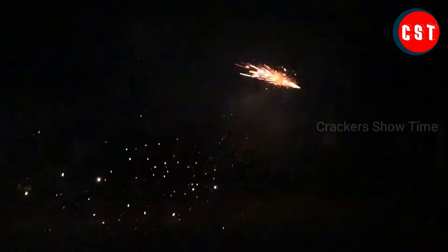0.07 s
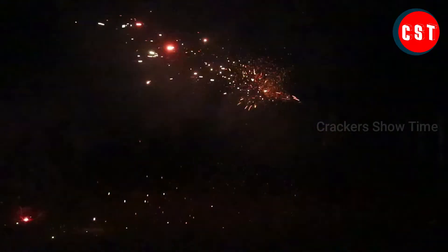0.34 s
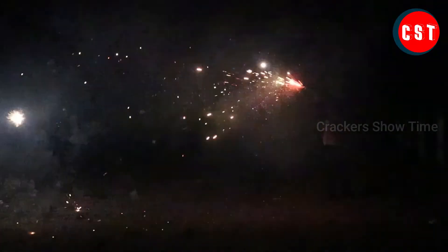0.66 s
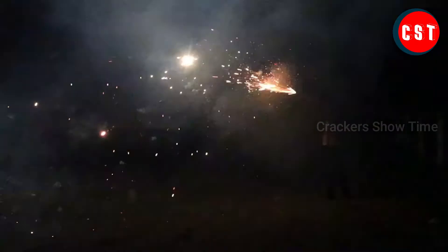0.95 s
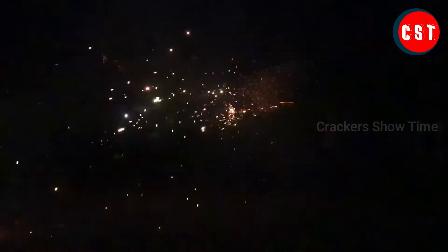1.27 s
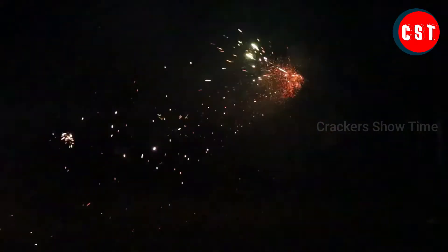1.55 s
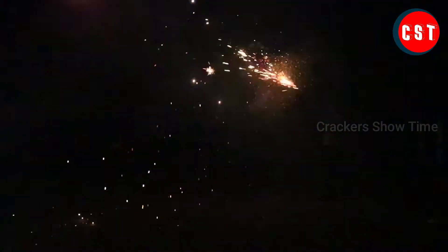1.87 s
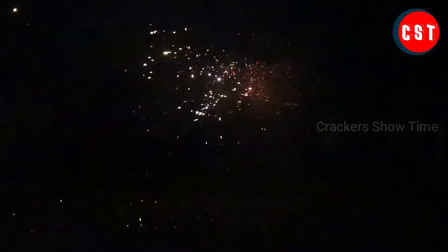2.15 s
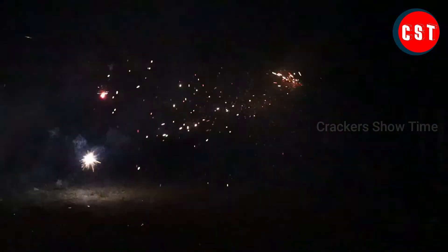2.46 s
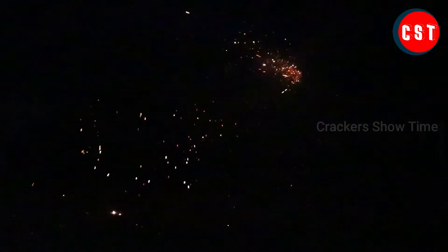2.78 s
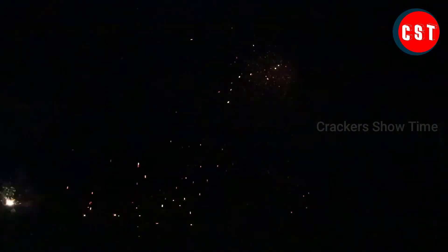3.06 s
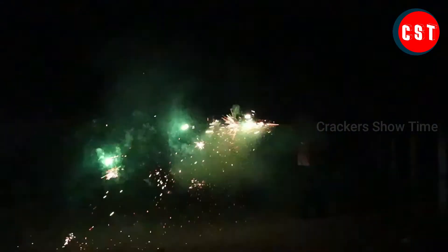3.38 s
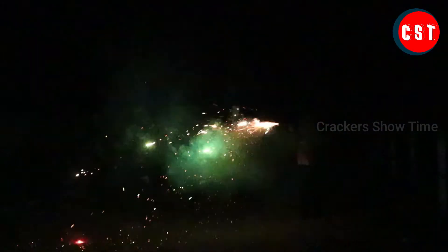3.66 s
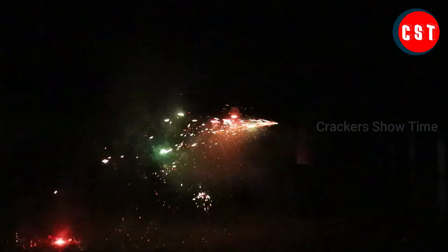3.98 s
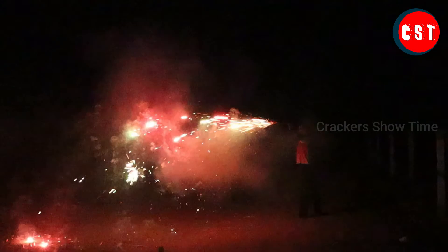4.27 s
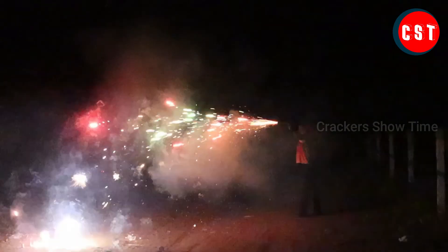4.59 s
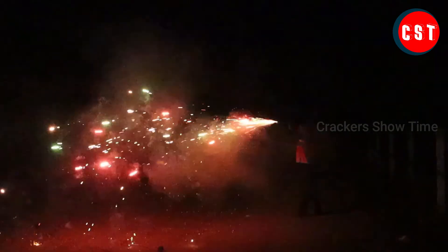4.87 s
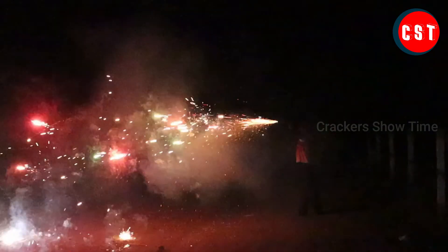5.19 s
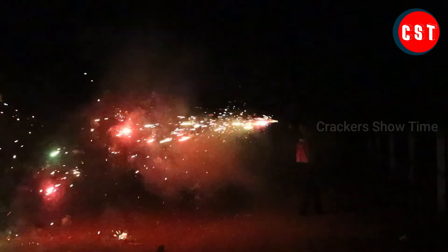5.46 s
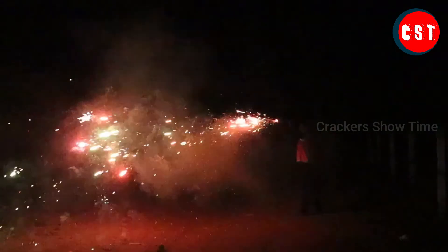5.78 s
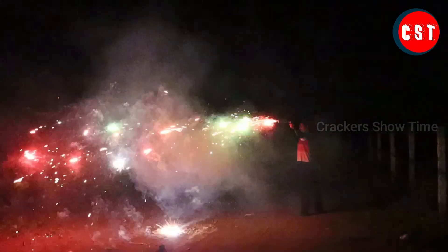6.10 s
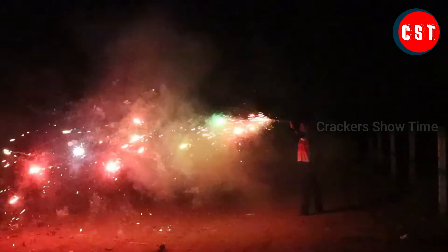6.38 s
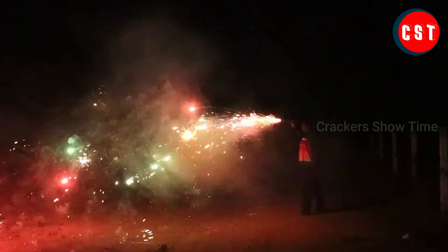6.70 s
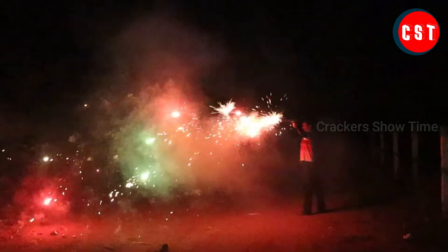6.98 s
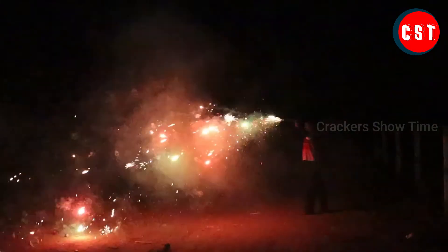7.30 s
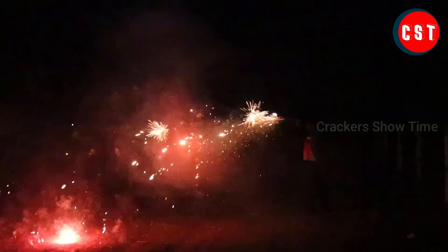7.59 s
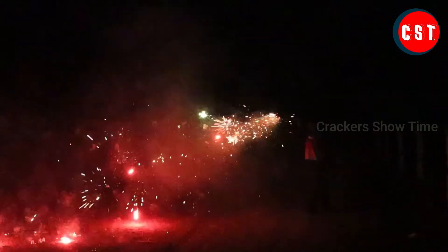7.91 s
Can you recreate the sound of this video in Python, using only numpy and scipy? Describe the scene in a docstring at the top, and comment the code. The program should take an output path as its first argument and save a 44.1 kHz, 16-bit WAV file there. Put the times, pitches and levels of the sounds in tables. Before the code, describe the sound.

A hand-held firework burns outdoors, some metres from the microphone. It opens with a soft hiss and fizz, dotted with tiny snapping sparks. From about 0.3 seconds its stars burst in a rapid, irregular volley of sharp, bright cracks, centred to slightly left. Each has a small thud, a close second crack and a short echo from the yard with a faint tail. The loudest, around 0.65, 0.9 and between 2.2 and 2.5 seconds, briefly overload the microphone. The cracks grow weaker and sparser near 3 seconds, and at about 3.4 seconds the crackling and its echo cut off abruptly. From there until the end at about 8 seconds, the firework gives only soft, uneven spurts of hiss, several a second and slightly hollow in tone. Some carry a low roar at their crest, most noticeably near 4.8 and 6.4 seconds.

```python
"""A soft hiss and fizz, then a volley of sharp cracks: a hand-held firework sprays sparks at night.
Each bursting star sends out a blast wave, followed by its reflection from the ground, a second crack
and the echo of the yard; the loudest overload the microphone some metres away. The crackling cuts off
abruptly, and soft, uneven spurts of hiss follow."""
import sys
import numpy as np
from scipy import signal
from scipy.fft import rfft, irfft, next_fast_len
from scipy.io import wavfile
from scipy.ndimage import uniform_filter1d

SR = 44100
rng = np.random.default_rng(int(sys.argv[2]) if len(sys.argv) > 2 else 0)


def store_wav(level_fs):
    """Save 16-bit WAV to argv[1]."""
    pcm = np.round(np.clip(np.atleast_2d(level_fs), -1, 1) * 32767)
    wavfile.write(sys.argv[1], SR, pcm.T.astype(np.int16))


N = 355005
TIME = np.arange(N) / SR
CRACKLE_END_S = 3.355


def gain_of(db):
    """Amplitude ratio: a factor of ten for every 20 dB."""
    return 10 ** (np.asarray(db) / 20)


def unit_rms(x):
    """Normalisation to a mean power of 1."""
    return x / np.sqrt(np.mean(x ** 2) + 1e-20)


def curve_at(points, hz):
    """Interpolation of (Hz, value) rows on a logarithmic frequency axis."""
    f, value = np.transpose(points)
    return np.interp(np.log(hz + 1), np.log(f + 1), value)


def leaning(db):
    """Level difference: gains of the two microphone ports for a lean, left minus right, in dB."""
    return gain_of(db * np.array([[.5], [-.5]]))


def add(mix, start_s, sound):
    """Superposition: a stereo sound adds to the mix from its start time."""
    part = mix[:, max(round(start_s * SR), 0):][:, :sound.shape[1]]
    part += sound[:, :part.shape[1]]


def convolve(x, taps):
    """Linear filtering by an impulse response, cut to the length of x."""
    return signal.fftconvolve(x, taps, axes=1)[:, :x.shape[1]]


def drift(window):
    """Slow random fluctuation: noise averaged twice over a window of samples."""
    return unit_rms(uniform_filter1d(uniform_filter1d(rng.standard_normal(N), window), window))


def blast(length_ms, late_ms=0., dull_hz=np.inf, rebound=6.6, size=2048):
    """Blast wave (1 - u) exp(-u): shock front, suction, slow rebound; a soft reflector dulls it."""
    hz = np.fft.rfftfreq(size, 1 / SR)
    s = 2j * np.pi * hz
    tau = max(length_ms, .02) / 1000
    shock = SR * tau ** 2 * s / (1 + s * tau) ** 2
    high_pass = s * tau * rebound / (1 + s * tau * rebound)
    delay = np.exp(-s * (late_ms + 1) / 1000)  # with 1 ms of lead-in
    return irfft(shock * high_pass * delay / (1 + hz / dull_hz))


def noise_tail(decay_ms, size=1024):
    """Exponential decay: a short random response, different at each port."""
    ms = np.arange(size) * 1000 / SR
    return rng.standard_normal((2, size)) * np.exp(-ms / decay_ms)


def scatter(decay_ms, ring_hz=2600, ring=0.76):
    """Scattering off rough surfaces: a short spray of unit energy with its own hollow colour."""
    taps = noise_tail(decay_ms)
    resonance = signal.iirpeak(ring_hz * 2 ** rng.uniform(-1, 1), 2, fs=SR)
    taps = taps + ring * signal.lfilter(*resonance, taps)
    taps = signal.lfilter(*signal.butter(1, 600, "high", fs=SR), taps)  # long waves are not scattered
    return unit_rms(taps) / np.sqrt(taps.shape[1])


# Balance of diffuse sound between the ports. Each row: frequency in Hz, lean in dB.
DIFFUSE_LEAN = [(60, -5), (110, 5.5), (200, 0.5), (380, 0.5), (700, 1), (1290, 5.5), (2380, 1.0),
                (4400, 2.0), (8120, 6), (15000, 4.5)]
def coloured(noise, spectrum):
    """Spectral shaping: diffuse noise takes on a colour and a lean in each band, at rms 1."""
    size = next_fast_len(N)
    hz = np.fft.rfftfreq(size, 1 / SR)
    lean_db = np.outer([.5, -.5], curve_at(DIFFUSE_LEAN, hz))
    shaped = rfft(noise, size) * gain_of(curve_at(spectrum, hz) + lean_db)
    return unit_rms(irfft(shaped, size)[:, :N])


# Course of the fizz. Each row: time in seconds, level in dB.
FIZZ_LEVELS = [(0, -50.5), (.3, -52), (.62, -59), (.8, -46), (1.15, -46), (1.45, -50), (1.85, -54.5),
               (2.1, -48.5), (2.7, -51.5), (2.85, -58), (3.0, -52), (3.17, -67)]
# Colour of the fizz. Each row: frequency in Hz, relative spectral density in dB.
FIZZ_SPECTRUM = [(30, -47.5), (100, -21.5), (250, -11), (600, 1), (1500, -3), (3000, 0.5), (5000, -2.5),
                 (8000, -4.5), (12000, -17.5), (16000, -23.5)]
def fizz(flutter_db=1.5):
    """Amplitude modulation: uneven burning makes a bed of noise flutter. Returns sound and envelope."""
    envelope = gain_of(np.interp(TIME, *np.transpose(FIZZ_LEVELS)))
    flutter = gain_of(flutter_db * drift(300))
    return envelope * flutter * coloured(rng.standard_normal((2, N)), FIZZ_SPECTRUM), envelope


def sparks(fizz_envelope, per_s=120, spread_db=6.0, over_fizz_db=-3):
    """Shot noise: tiny sparks of three sizes snap at random, each size from its own direction."""
    out = 0
    for length_ms, lag_ms in ((.04, 0.041), (.06, 0.0045), (.1, -0.05)):
        fires = rng.random(N) < per_s / 3 / SR
        clicks = fires * gain_of(spread_db * np.minimum(rng.exponential(1, N), 2.5))
        snap = np.array([blast(length_ms, late) + .5 * blast(length_ms, late + 2)
                         for late in (0, lag_ms)])
        snap = snap + .5 * convolve(snap, scatter(decay_ms=0.97))
        out = out + unit_rms(convolve(np.tile(clicks, (2, 1)), snap))
    return gain_of(over_fizz_db) * fizz_envelope * unit_rms(out)


# Decay of the long echo. Each row: frequency in Hz, reverberation time in seconds.
ECHO_T60 = [(100, 0.6), (500, 0.9), (2500, 1.1), (8000, 0.5), (15000, 1.1)]
# Colour of both echoes. Each row: frequency in Hz, relative level in dB.
ECHO_SPECTRUM = [(60, -12), (250, -4), (700, 1), (2500, -0.5), (6000, 5), (11000, 1.5), (15000, 9)]
def yard_echo(sound, early_db=-13, early_t60=0.049, late_db=-11, echoes_per_s=4000):
    """Reverberation: ground, trees and walls return a quick dense echo and a long faint one."""
    build_up = np.clip(np.arange(SR) / SR / 0.015, 0, 1)
    taps = rng.standard_normal((2, SR)) * (rng.random((2, SR)) < echoes_per_s / SR) * build_up
    hz, age_s, bands = signal.stft(taps, SR, nperseg=256)
    bands = bands * gain_of(curve_at(ECHO_SPECTRUM, hz))[:, None]
    response = 0
    for db, t60 in ((early_db, early_t60), (late_db, curve_at(ECHO_T60, hz)[:, None])):
        echo = signal.istft(bands * gain_of(-60 * age_s / t60), SR, nperseg=256)[1]
        response = response + gain_of(db) * echo / np.linalg.norm(echo[0])
    return convolve(sound, response)


def hollow_noise(delay_ms=1.9, wander_ms=0.398, share=0.36):
    """Comb filtering: noise interferes with a delayed copy; the hollow colour shifts with the delay."""
    noise, samples = rng.standard_normal((2, N)), np.arange(N)
    delay = (delay_ms + wander_ms * drift(12000)) * SR / 1000
    return noise + share * np.array([np.interp(samples - delay, samples, port) for port in noise])


# Swells of hiss. Each row: time of the crest in seconds, hiss level in dB, rise in ms,
# roar relative to the hiss in dB before the roar's boost.
SWELLS = [(0.0, -39.5, 34, -21), (0.157, -34.5, 10, -15), (0.2, -41, 34, -29), (0.826, -28, 7, -17.5),
          (0.868, -40, 24, -27), (1.869, -45, 23, -5), (3.441, -48, 43, -17.5), (3.557, -40, 46, -43),
          (3.674, -39, 43, -19.5), (3.733, -42, 53, -18), (4.079, -42, 55.4, -22.5),
          (4.428, -42.5, 70, -27), (4.561, -39.5, 49, -20), (4.808, -36.5, 44, -11),
          (4.964, -44, 51, -23.5), (5.207, -43, 42, -10.5), (5.375, -38.5, 70, -15.5),
          (5.508, -44.5, 71, -47.5), (5.8, -44.0, 43, -29), (5.857, -43, 61, -42), (5.953, -48.5, 41, -25),
          (6.056, -43, 43, -43), (6.179, -39.5, 49, -19.5), (6.295, -47.5, 39, -32),
          (6.442, -38, 60, -10.5), (6.556, -50, 29, -41), (6.733, -41, 45, -43), (6.793, -39.8, 47, -17.5),
          (6.954, -56.0, 54, -30), (7.048, -45.5, 43, -40), (7.143, -42, 75, -34), (7.302, -40.5, 53, -16),
          (7.489, -39.5, 41.4, -14.5), (7.686, -38.5, 45.7, -13), (7.857, -43, 65, -49),
          (8.051, -43, 55, -44)]
# Colours of the hiss and the roar. Each row: frequency in Hz, relative spectral density in dB.
HISS_SPECTRUM = [(35, -49.5), (100, -32), (300, -7.5), (450, -11.5), (650, 1), (900, -4.5), (1200, 0),
                 (2200, 0), (3200, 2.5), (5000, -3), (8000, -6), (12000, -5.5), (16000, -17)]
ROAR_SPECTRUM = [(25, -34), (60, -26), (120, -10.5), (260, 4), (460, -0.5), (750, 0.5), (1000, -5),
                 (1500, -6), (3000, -10), (8000, -46)]
# Swing of the swells from side to side. Each row: time in seconds, lean in dB.
SWELL_LEAN = [(3.5, -2), (4.6, 0), (4.85, 3.5), (5.45, -0.1), (8, -0.5)]
def hiss_swells(roar_boost_db=9.5, roar_growth=1.58, abruptness=2.38, fall_per_rise=1.26):
    """Amplitude modulation of noise: soft, uneven whooshes of hiss with a low roar at their crests."""
    t = np.arange(0, N / SR, .001)
    # a faint steady hiss lies under the swells once the crackling ends
    hiss_power, roar_power = np.outer(gain_of([-61, -89]) ** 2, t > CRACKLE_END_S)
    for crest_s, db, rise_ms, roar_db in SWELLS:
        age = (t - crest_s) * 1000 / rise_ms
        rounded_rise = abs(age) ** abruptness
        fall = np.sqrt(1 + 3 * (age / fall_per_rise) ** 2) - 1  # tends to an exponential decay
        swell_db = -10 * np.where(age < 0, rounded_rise, fall)
        hiss_power += gain_of(db + swell_db) ** 2
        roar_power += gain_of(db + roar_db + roar_growth * swell_db) ** 2
    hiss = np.interp(TIME, t, np.sqrt(hiss_power)) * coloured(hollow_noise(), HISS_SPECTRUM)
    roar = np.interp(TIME, t, np.sqrt(roar_power)) * coloured(hollow_noise(), ROAR_SPECTRUM)
    flutter = gain_of(0.58 * drift(300))
    swing = leaning(np.interp(TIME, *np.transpose(SWELL_LEAN)))
    return (hiss + gain_of(roar_boost_db) * roar) * flutter * swing


def low_thump(decay_ms=2.2, band_hz=(200, 800)):
    """Band-limited decay: a short low-mid thud after each crack, different left and right."""
    taps = unit_rms(noise_tail(decay_ms))
    return signal.lfilter(*signal.butter(2, band_hz, "band", fs=SR), taps / np.sqrt(taps.shape[1]))


def second_crack(length_ms, longest_ms=.22, dull_hz=22000, lean_db=5, lag_ms=0.15, rough_db=-2):
    """Delayed arrival: an echo or another pop close behind, from the left, with a ragged tail."""
    length_ms = min(length_ms, longest_ms)  # stays sharp even after a heavy blast
    crack = leaning(lean_db) * np.array([blast(length_ms, late, dull_hz) for late in (0, lag_ms)])
    return crack + gain_of(rough_db) * convolve(crack, scatter(decay_ms=1.))


def star_burst(length_ms, ground_ms, lean_db, centre_db=1.76, heavy_ms=0.2, ground_hz=14000):
    """Two-path propagation: a star's blast reaches each port directly and again off the ground."""
    leftness_db = lean_db - centre_db
    right_lag_ms = -0.0151 * leftness_db + .025 * rng.standard_normal()
    bounce = 0.63 * gain_of(-0.8 * leftness_db)  # stars further left have fallen lower and bounce less
    bounce /= 1 + (length_ms / heavy_ms) ** 4  # heavy blasts go off on the ground and hardly bounce
    ports = [blast(length_ms, late) + bounce * blast(length_ms, late + ground_ms, ground_hz)
             for late in (0, right_lag_ms)]
    return leaning(lean_db) * np.array(ports)


def small_stars(from_s=0.8, to_s=3.08, per_s=8):
    """Uniform chance: faint stars burst at random moments. Returns rows with the columns of STARS."""
    chance = rng.random((round(per_s * (to_s - from_s)), 7))
    times = from_s + (to_s - from_s) * chance[:, 0]
    mean, spread = np.transpose([(-19.5, 2), (.07, .02), (2, .4), (19, 3), (-6.5, 4.5), (2, 2)])
    return np.column_stack([times, mean + spread * (2 * chance[:, 1:] - 1)]).tolist()


# Bursting stars. Each row: start in seconds, level in dB, blast length in ms, ground bounce delay in ms,
# delay of a second crack in ms, its level relative to the blast in dB, lean of the blast in dB.
STARS = [(.336, -15, .056, 1.4, 9.8, -18, 2.5), (0.3515, -6.5, .13, 1.7, 18, -6, 0.5),
         (0.3603, 3.5, .077, 2.1, 15.7, -13, 2.5), (.379, 3.5, .11, 2.03, 16.4, -11.5, 1),
         (0.4327, -4.5, .1, 1.9, 15, -14, 1), (0.4444, 4, 0.11, 2.15, 16.5, -10.5, 0.5),
         (.49, 0.5, 0.14, 2.4, 13.3, 2.5, 2.5), (0.4995, 2, 0.14, 2.43, 10.6, -10, -1),
         (0.6447, -9, 0.045, 2.1, 16, -11, -4), (.6492, 10.5, 0.12, 1.66, 19.4, -7, 1.5),
         (.662, 0, 0.27, 1.3, 11.7, -11, 8), (0.6667, 5, 0.1, 1.95, 14.1, -6, 3),
         (.7108, -1.5, .1, 1.55, 7.2, .5, 5.5), (.786, -2.5, 0.1, 1.4, 6.1, 1.5, 7.5),
         (0.8205, 1.5, 0.14, 1.65, 15.8, -18, 4.5), (.857, -7, 0.1, 2.2, 19, -3.5, 2),
         (0.9054, 1.5, 0.29, 2.2, 13.4, -20, 2), (0.9203, 8.5, .16, 1.21, 9.1, -11, 3.5),
         (0.9595, -10.5, 0.071, 2.5, 16.2, 1, 3), (1.0397, -10, .075, 2.2, 15.5, -6, 2),
         (1.0793, 2.5, .1, 2, 16.8, -7, 1.5), (1.1, -8, 0.056, 1.3, 14.2, -1, -2),
         (1.1898, -3.5, .11, 1.9, 14.5, -7.5, 1), (1.2443, -7.5, .11, 1.96, 12, -3, 1.5),
         (1.3035, -4.5, 0.057, 2.4, 24, -12.5, 4.5), (1.3098, 2.5, 0.14, 1.34, 9.9, -6, 6),
         (1.4446, -13.5, 0.15, 1.75, 19, -15, 2), (1.472, 7.5, 0.13, 1.9, 18, -12.5, 10),
         (1.4776, 2.5, 0.062, 2, 22, -22, 1.5), (1.5185, 2, 0.15, 1.07, 10.2, -2, 4.5),
         (1.6364, 4, 0.15, 1.5, 14.4, -11, 1.5), (1.6842, 6.5, .33, 1.5, 10.1, -9.5, 3.5),
         (1.6959, -4.5, 0.18, 1.8, 8.1, -8.5, 6), (1.8194, -14.5, .19, 2.8, 18.6, -3.5, 1.5),
         (1.8683, -15, 0.27, 1.5, 12.4, -3, -0.5), (1.9235, -14, 0.07, 2, 18.4, -3, 1.5),
         (1.973, -15, .08, 1.96, 18, -7, 3), (2.0134, -3.5, .14, 2.1, 16.4, -5, 1.5),
         (2.121, -8.5, .16, 2, 15.6, -5.5, 1), (2.173, 9.5, 0.36, 1.7, 15.8, -12.5, 2.5),
         (2.186, 0, .2, 2.7, 15, -11.5, 11), (2.1954, 8.5, 0.08, 2.3, 16.5, -12, 2),
         (2.2294, -0.5, 0.81, 2.3, 13.9, -4, 0), (2.3137, 15, 0.19, 1.7, 18, -19, 4),
         (2.355, -.5, 0.19, 1.64, 7.1, -10.5, 7), (2.3839, -1, .15, 1.58, 14.6, -7, -.5),
         (2.5226, 8.5, .11, 2.3, 12.1, -1.5, -1.5), (2.588, 2, .11, 1.26, 7.9, -3, 6),
         (2.6753, -14, .062, 2.4, 16, -25, -2), (2.7282, -1, 0.1, 2.56, 15.8, -6.5, 1),
         (2.8083, -10.5, 0.056, 2.1, 19, -1, 2), (2.8375, -4.5, 0.057, 2.1, 16, -4, 1),
         (2.8893, 4.5, 0.22, 1.6, 7.5, -5.5, 6.5), (2.9369, -2, .16, 1.6, 16.1, -25, 7.5),
         (3.0055, -1, 0.13, 1.94, 17.7, -10, 1.5), (3.1921, -6.5, 0.16, 1.1, 4.64, -10, 3.5),
         (3.3012, -6.5, 0.098, 1.7, 18.2, -5.5, 3.5)]
def crackling_stars(thump_db=-2, near_db=-10, near_ms=2.6, dryness=.4):
    """Superposition of blasts, thuds and second cracks. Returns them and what reaches the yard."""
    heard, to_yard = np.zeros((2, 2, N))
    for start_s, db, length_ms, ground_ms, second_ms, second_db, lean_db in STARS + small_stars():
        burst = gain_of(db) * star_burst(length_ms, ground_ms, lean_db)
        second = gain_of(db + second_db) * second_crack(length_ms)
        wet = gain_of(-dryness * max(db, 0))  # the loudest stars burst closest, so they sound drier
        thump = gain_of(thump_db) * convolve(burst, low_thump())
        spray = wet * gain_of(near_db) * convolve(burst, scatter(near_ms))
        start_s -= .001  # allows for the blast's lead-in
        add(heard, start_s, burst + thump + spray)
        add(to_yard, start_s, wet * burst)
        for mix in (heard, to_yard):
            add(mix, start_s + second_ms / 1000, second)
    return heard, to_yard


# Frequency responses of the two microphone ports. Each row: frequency in Hz, gain in dB.
LEFT_RESPONSE = [(30, -9), (100, 0.5), (250, 0.5), (700, -4), (1300, -2), (3000, 1.5), (4500, 2), (6000, 3),
                 (8000, 6), (11000, 8.5), (15500, 1)]
RIGHT_RESPONSE = [(30, -5.5), (100, 4), (250, 3), (700, -2), (1300, -3.5), (3000, 5), (4500, 2),
                  (6000, 4.5), (8000, 1), (11000, 6), (15500, -1.5)]
def microphone_ports(sound, size=2048):
    """Minimum-phase filtering: each port colours a blast without ringing ahead of it."""
    hz = np.fft.rfftfreq(size, 1 / SR)
    response_db = np.array([curve_at(LEFT_RESPONSE, hz), curve_at(RIGHT_RESPONSE, hz)])
    cepstrum = irfft(response_db * np.log(10) / 20)
    cepstrum[:, 1:size // 2] *= 2  # folding onto positive time makes the response causal
    cepstrum[:, size // 2 + 1:] = 0
    return convolve(sound, irfft(np.exp(rfft(cepstrum))))


def scene():
    """Superposition of the sources: the crackling cuts off abruptly and soft spurts of hiss follow."""
    swells = hiss_swells()
    bed, fizz_envelope = fizz()
    snaps = sparks(fizz_envelope)
    blasts, to_yard = crackling_stars()
    crackle = microphone_ports(blasts + snaps + yard_echo(to_yard)) + bed
    cutoff = np.clip((CRACKLE_END_S - TIME) / 0.0035, 0, 1)
    return crackle * cutoff + swells


def record(dry, shave_hz=250, ceiling=.92, band_limit_hz=16100):
    """Clipping: overload shaves the tips off the loudest blasts, sparing their bass; then a low-pass."""
    excess = dry - np.clip(dry, -1, 1)
    tips = signal.filtfilt(*signal.butter(1, shave_hz, "high", fs=SR), excess)
    clipped = np.clip(dry - tips, -ceiling, ceiling)
    low_pass = signal.firwin(255, band_limit_hz, window=("kaiser", 8), fs=SR)
    return signal.oaconvolve(clipped, low_pass[None], "same", axes=1)


dry = scene()
out = record(dry)
store_wav(out)
```